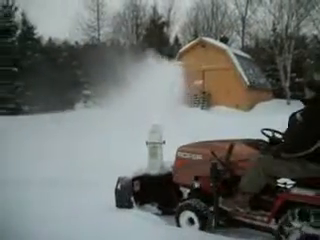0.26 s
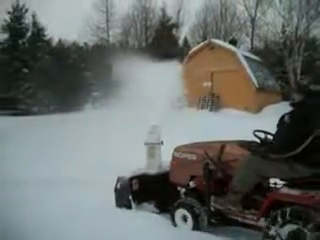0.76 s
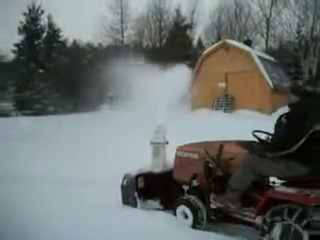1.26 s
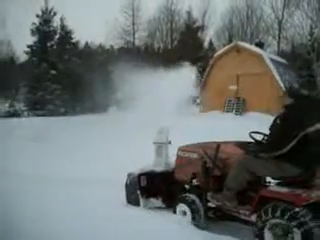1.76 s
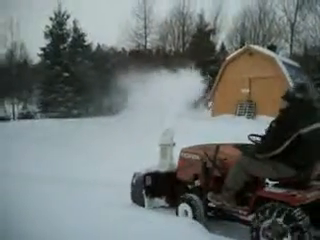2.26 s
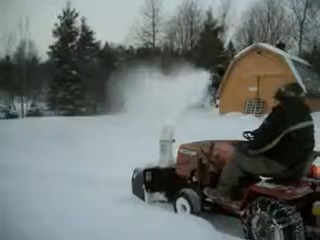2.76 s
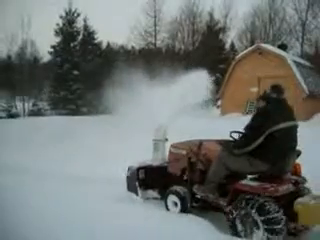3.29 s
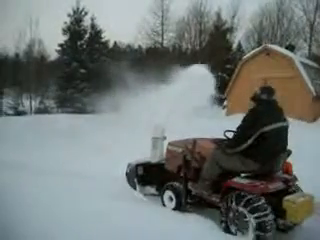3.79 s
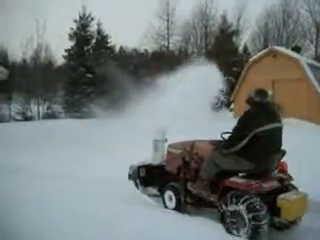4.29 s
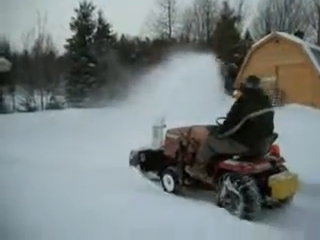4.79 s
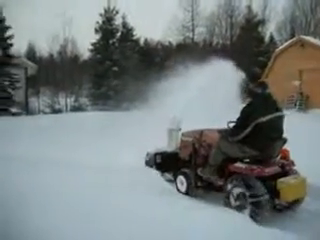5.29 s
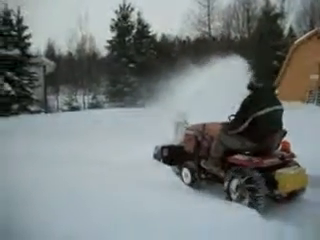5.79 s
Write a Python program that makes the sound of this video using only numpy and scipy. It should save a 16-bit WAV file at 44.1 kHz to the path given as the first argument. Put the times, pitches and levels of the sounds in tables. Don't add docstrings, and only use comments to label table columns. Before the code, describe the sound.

From 0 to 6 seconds a small two-cylinder tractor engine runs without a break, a dense low hum at nearly constant pitch that hunts slightly with the load, its uneven firings giving a rapid coarse throb. A front snowblower works throughout: churned snow makes a broad, rough low roar, and tin and valve gear clatter brightly in time with the crank. Sharp loose-panel rattles are busiest in the first 1.6 seconds, with more around 2.6, 3.5, 4.2 and 5.7; dull ice knocks strike irregularly. From about 2 to 4 seconds the machine turns and the snow rushing through the chute becomes clearer, falling back near 4.8 to 5. The clatter softens, the hum fills out slightly, and the blower just begins to fade after 5.8. Faint gear whine and low wind gusts lie underneath. Open, dry, close, with harsh, grainy low-quality treble.

```python
import sys
import numpy as np
from scipy import signal
from scipy.fft import rfft, irfft, next_fast_len
from scipy.io import wavfile
from scipy.ndimage import uniform_filter1d

SR = 44100
rng = np.random.default_rng(int(sys.argv[2]) if len(sys.argv) > 2 else 0)


def volts_from_db(level):
    exponent = np.asarray(level, float) / 20
    return 10 ** exponent


def inscribe(sig):
    pcm = np.round(np.clip(np.atleast_2d(sig).T, -1, 1) * 32767)
    wavfile.write(sys.argv[1], SR, pcm.astype(np.int16))


N = 266784
TIME_S = np.arange(N) / SR


def evened(x):
    return x / np.sqrt(np.mean(x ** 2) + 1e-20)


def coloured(x, spectrum):
    size = next_fast_len(N)
    f_hz, level_db = np.transpose(spectrum)
    bins_hz = np.fft.rfftfreq(size, 1 / SR)
    gain_db = np.interp(np.log(bins_hz + 1), np.log(f_hz + 1), level_db)
    return evened(irfft(rfft(x, size) * volts_from_db(gain_db), size)[:N])


def drifting(rate_hz):
    knots = rng.standard_normal(2000)
    return np.interp(TIME_S * rate_hz, np.arange(2000), knots)


def along(rows):
    t_s, value = np.transpose(rows)
    return np.interp(TIME_S, t_s, value)


def throb(turns, at, width):
    return np.exp((np.cos(2 * np.pi * (turns - at)) - 1) / width)


def crank_turns():
    # t/s, crank speed/Hz
    speed = [(0.0, 52.28), (0.292, 52.31), (0.399, 52.57), (0.73, 52.75), (1.111, 52.53), (1.431, 52.15),
             (2.017, 52.74), (2.337, 52.17), (2.891, 51.85), (3.326, 52.47), (3.619, 51.43), (3.824, 51.28),
             (3.982, 52.43), (4.469, 51.72), (5.081, 51.89), (5.316, 52.16), (5.492, 51.82), (6.05, 51.86)]
    turns = np.cumsum(along(speed)) / SR
    return turns - turns[round(3.7958 * SR)]


def turned_away():
    # t/s, heading/0-1
    heading = [
        (0, 0.07),
        (1.5, 0.15),
        (2.5, 0.4),
        (3.5, 0.47),
        (4.5, 0.58),
        (5.5, 0.72),
        (6.05, 0.76),
    ]
    return np.clip(along(heading), 0, 1)


def exhaust(turns, away):
    side_on = [(0.5, -38), (1.0, -18.5), (1.5, -72), (2.0, -18.5), (2.5, -34), (3.0, -13), (3.5, -48),
               (4.0, -34.5), (4.5, -31), (5.0, -21), (5.5, -40), (6.0, -35), (6.5, -36.5), (7.0, -33.5),
               (7.5, -34), (8.0, -38.5), (8.5, -37), (9.0, -40.5), (9.5, -36.5), (10.0, -40.5), (10.5, -45),
               (11.0, -36.5)]
    from_behind = [(0.5, -38), (1.0, -17), (1.5, -35), (2.0, -21), (2.5, -31.5), (3.0, -12), (3.5, -68),
                   (4.0, -20), (4.5, -54), (5.0, -24), (5.5, -52), (6.0, -23.5), (6.5, -36), (7.0, -29),
                   (7.5, -68), (8.0, -27), (8.5, -40), (9.0, -34), (9.5, -49), (10.0, -37), (10.5, -34),
                   (11.0, -37.5)]
    hum = np.zeros(N)
    for (order, side_db), (_, behind_db) in zip(side_on, from_behind):
        lag_rad = 0.15 + 0.5 * (order % 2 == 0) + 0.7 * order * (order in (1, 2))
        phase_rad = 2 * np.pi * order * turns + lag_rad + 0.04 * order * drifting(30)
        level_db = side_db + away * (behind_db - side_db)
        if order == 7:
            level_db = level_db - 9 * np.exp(-((away - 0.45) / 0.16) ** 2)
        waver_db = 0.37 + 0.67 / order ** 2 * (order >= 1)
        hum -= volts_from_db(level_db + waver_db * drifting(12)) * np.cos(phase_rad)
    return evened(hum) * volts_from_db(0.5 * drifting(52)) * volts_from_db(-12.5 + 1.03 * away)


def valve_pops(turns, at, lean, side_db, behind_db, away):
    sizes = lean + rng.standard_normal(800)
    size = sizes[np.round(turns - at).astype(int) % 800]
    stronger = 1 + 0.4 * np.cos(np.pi * np.round(turns + at))
    level_db = side_db + away * (behind_db - side_db)
    pulse = size * stronger * throb(turns, at, 0.0052) * volts_from_db(level_db)
    return pulse - uniform_filter1d(pulse, size=240)


def turning_noise(side, behind, away, gate_db):
    white = rng.standard_normal(N) * volts_from_db(gate_db)
    return evened((1 - away) * coloured(white, side) + away * coloured(white, behind))


def snow_roar(gate_db, away):
    # f/Hz, level/dB per Hz
    roar_side = [(18, -33), (30, -40), (107, -3), (159, -14), (181, -5), (209, -5.5), (265, -13.5),
                 (312, -12), (589, -4.5), (1070, -9), (1780, -21), (2030, -19), (2300, -28), (2990, -57),
                 (5060, -120)]
    # f/Hz, level/dB per Hz
    roar_behind = [(18, -35), (30, -14), (103, -2.5), (157, -8), (178, -14), (206, -7.5), (260, -13.5),
                   (402, -16), (746, -6), (928, -11.5), (1240, -16), (1880, -30.5), (2300, -21),
                   (2990, -46), (5060, -120)]
    return volts_from_db(-20 - 1.3 * away) * turning_noise(roar_side, roar_behind, away, gate_db)


def tin_clatter(gate_db, away):
    # f/Hz, level/dB per Hz
    tin_side = [(1000, -9), (1700, -5.5), (1800, -13), (2000, -2), (2280, -8.5), (2400, -7), (2830, -6),
                (3060, -3.5), (3350, -9.5), (3850, -2.5), (4300, -8), (4940, -4.5), (5600, -13),
                (7280, -44), (12300, -120)]
    # f/Hz, level/dB per Hz
    tin_behind = [(1000, -24), (1700, -5), (1820, 0), (1920, -4.5), (2160, -2), (2240, -20), (2320, -4),
                  (2620, 2.5), (2800, -5.5), (3110, -2), (3370, -4), (3890, -1), (4240, -5), (4970, -4),
                  (5600, -9), (7280, -43), (12300, -120)]
    return volts_from_db(-25.5 - 4.5 * away) * turning_noise(tin_side, tin_behind, away, gate_db)


def chute(gate_db):
    swing_in = np.minimum(1 + (TIME_S - 2.0) / 2.1, 1)
    hide = np.maximum(1 - (TIME_S - 4.77) / 0.24, 0)
    in_line = np.minimum(swing_in, hide)
    band = signal.butter(2, [2375, 2495], "band", fs=SR, output="sos")
    rush = evened(signal.sosfilt(band, rng.standard_normal(N) * volts_from_db(gate_db)))
    return volts_from_db(-36 - 9 * (1 - in_line)) * rush


def snow_bounce(x, away):
    notch_hz, width_hz = 1770 + 110 * away, 137
    depth = np.clip(0.32 + 0.25 * away, 0, 1)
    shift = np.exp(2j * np.pi * np.cumsum(notch_hz) / SR)
    pole = np.exp(-np.pi * width_hz / SR)
    band = shift * signal.lfilter([1 - pole], [1, -pole], x / shift)
    return x - depth * 2 * band.real


def struck_rings(rows, extra_db, t60_s):
    out, t_s = np.zeros(N + SR), np.arange(1500) / SR
    chance = rng.standard_normal((len(rows), 1500))
    for (start_s, peak_db, ring_hz), noise in zip(rows, chance):
        ring = np.sin(2 * np.pi * ring_hz * t_s) + 1.36 * uniform_filter1d(noise, size=4)
        envelope = volts_from_db(peak_db + extra_db - 60 * t_s / t60_s) * np.minimum(t_s / 0.0026, 1)
        out[round(start_s * SR):][:1500] += envelope * ring
    return out[:N]


def valve_jolts(turns):
    panels_hz = [2480, 2680, 3060, 3750]
    cycle = np.arange(np.ceil(turns[0] / 2), turns[-1] / 2 - 1)
    luck, panel, late, size = rng.random((len(cycle), 4)).T
    jolt_turns = 2 * (cycle + 0.6 + 0.09 * (2 * late - 1))
    start_s = np.interp(jolt_turns, turns, TIME_S)
    level_db = -19 + 3 * (2 * size - 1)
    ring_hz = np.take(panels_hz, (panel * len(panels_hz)).astype(int))
    return np.transpose([start_s, level_db, ring_hz])[luck < 0.14]


def panel_rattles(turns):
    # t/s, peak level/dB, f/Hz
    hard_rattles = [(0.0273, -5, 4020), (0.0712, 0, 3000), (0.2259, -2, 3680), (0.415, -3, 2500),
                    (0.646, 2, 4100), (0.6749, -11, 3700), (0.9063, -3, 3060), (1.056, 0, 3100),
                    (1.2446, -10, 3900), (1.4032, -4, 2470), (1.5938, -12, 2530), (2.6219, 0, 2420),
                    (2.6623, -8, 3760), (3.1976, -14, 2500), (3.4361, -3, 2440), (3.5967, 1, 2700),
                    (4.0881, -8, 2400), (4.2303, 1, 2540), (5.2096, -11, 3960), (5.64, -1, 3940),
                    (5.855, -3, 3920), (5.891, -6, 3730)]
    return struck_rings([*hard_rattles, *valve_jolts(turns)], -13.0, 0.018)


def ice_knocks():
    # t/s, peak level/dB, f/Hz
    lumps = [(0.07, -7, 750), (0.189, -10, 762), (0.298, -6, 700), (0.425, -9, 800), (0.717, -13, 592),
             (1.31, -11, 592), (1.405, -8, 900), (2.017, -6, 606), (2.738, -24, 681), (3.752, -11, 450),
             (3.92, -5, 450), (4.448, -9, 541), (4.822, -7, 775), (5.199, -14, 727), (5.327, -8, 825),
             (5.892, -7, 600)]
    return struck_rings(lumps, -0.5, 0.016)


def gear_whine(turns, away):
    gears = [(20, -33, -40), (21.5, -46, -35), (24, -40, -33)]
    out = np.zeros(N)
    for order, side_db, behind_db in gears:
        level_db = side_db + away * (behind_db - side_db) + 1.8 * drifting(6)
        out += volts_from_db(level_db) * np.sin(2 * np.pi * order * turns + 0.8 * drifting(12))
    return out


def wind_gusts():
    # f/Hz, level/dB per Hz
    gust = [(1, 0), (12, 0), (25, -8), (42, -9), (60, -40)]
    return volts_from_db(-36 + 2.1 * drifting(2.6)) * coloured(rng.standard_normal(N), gust)


def scene():
    away = turned_away()
    turns = crank_turns()
    engine = exhaust(turns, away)
    engine = engine + valve_pops(turns, -0.037, -0.31, -31.5, -20.5, away)
    engine = engine + valve_pops(turns, 0.5, 1.5, -14, -23, away)

    firing = throb(turns / 2, 0, 0.037)
    puff = throb(2 * turns, 0, 1.0)
    knock = throb(turns / 2, 0.585, 0.15)
    shake = drifting(60)
    roar_gate_db = 1.6 * firing + 1.0 * puff + 2.0 * knock + 0.8 * shake + 1.3 * drifting(150)
    tin_gate_db = 0.5 * firing + 2.0 * puff + 3 * knock + 0.27 * shake
    tin_gate_db = tin_gate_db + 1.5 * drifting(200) + 0.25 * drifting(15)

    blower = snow_roar(roar_gate_db, away) + tin_clatter(tin_gate_db, away) + chute(tin_gate_db)
    blower = blower * volts_from_db(-7 * np.maximum(TIME_S - 5.77, 0))
    blower = snow_bounce(blower, away)
    mix = engine + blower + panel_rattles(turns) + ice_knocks() + gear_whine(turns, away) + wind_gusts()
    return mix[None]


def sample_and_hold(x):
    hold_hz = 11032.4
    tick = np.floor(np.arange(N) * hold_hz / SR) * SR / hold_hz
    return np.interp(tick, np.arange(N), x)


def band_limited(x):
    # t/s, f/Hz
    edge = [
        (0, 12270),
        (.5, 12390),
        (1.15, 12520),
        (2.1, 12510),
        (2.7, 12360),
        (3.5, 12310),
        (5.5, 12310),
        (5.9, 12260),
    ]
    f_hz, t_s, z = signal.stft(x, SR, nperseg=2048)
    passed = f_hz[:, None] < np.interp(t_s, *np.transpose(edge))
    return signal.istft(z * passed, SR, nperseg=2048)[1][:N]


def band_limit(x):
    return signal.sosfilt(signal.butter(12, 12520, fs=SR, output="sos"), x)


def record(dry):
    dull = signal.sosfilt(signal.butter(4, 5600, fs=SR, output="sos"), dry)
    held = np.clip(sample_and_hold(dull[0]), -0.94, 0.94)
    mix = band_limited(held)[None]
    return band_limit(mix)


dry = scene()
out = record(dry)
inscribe(out)
```